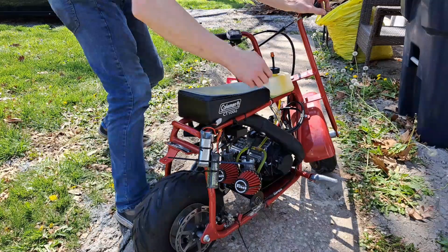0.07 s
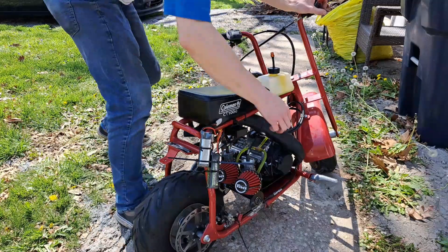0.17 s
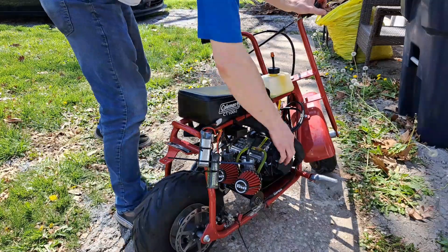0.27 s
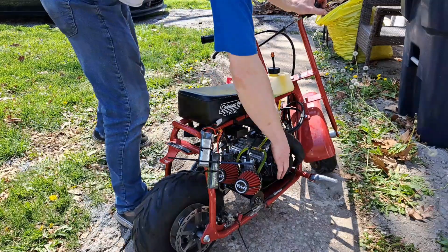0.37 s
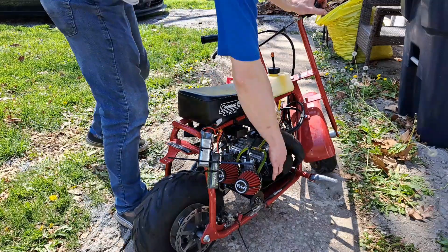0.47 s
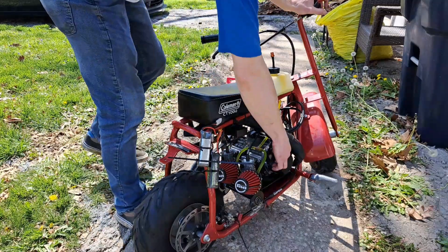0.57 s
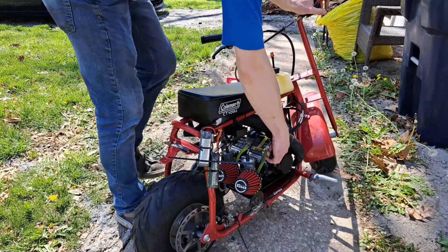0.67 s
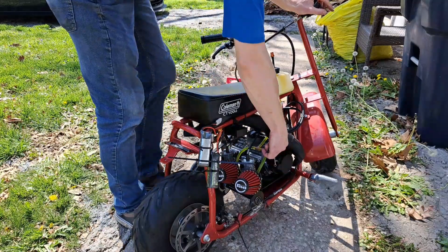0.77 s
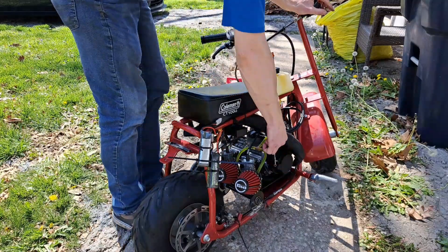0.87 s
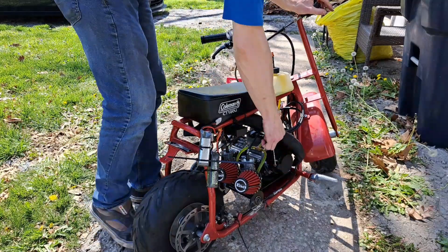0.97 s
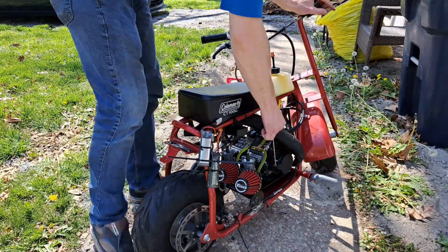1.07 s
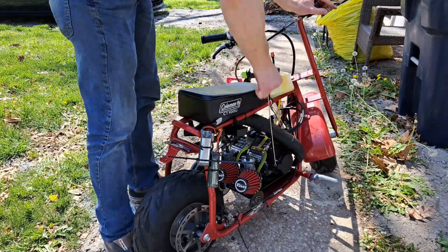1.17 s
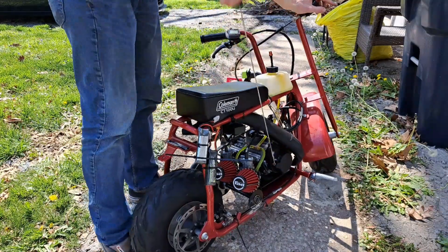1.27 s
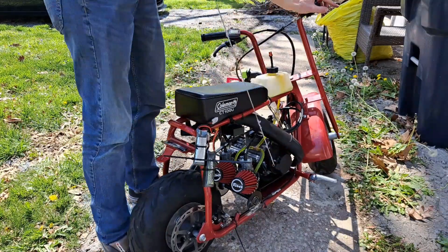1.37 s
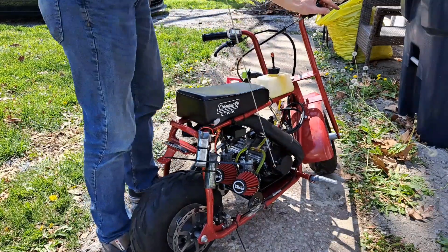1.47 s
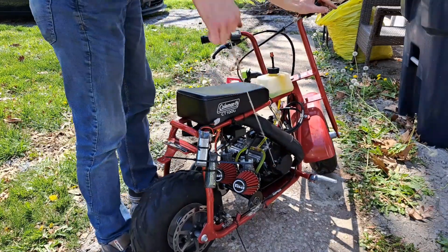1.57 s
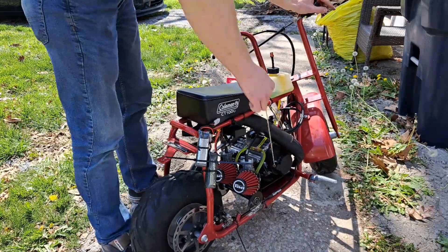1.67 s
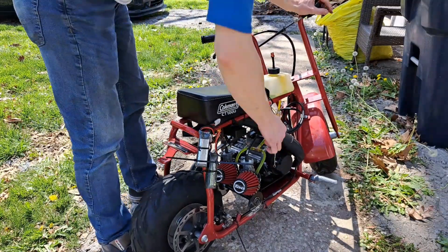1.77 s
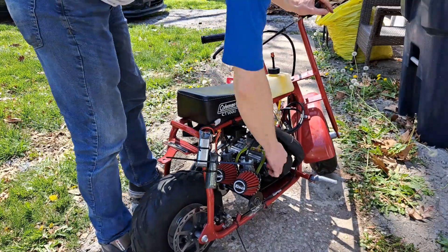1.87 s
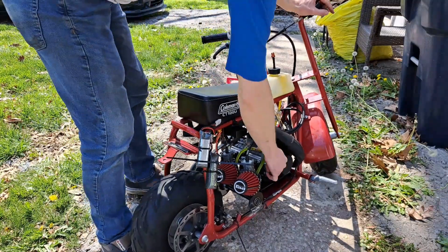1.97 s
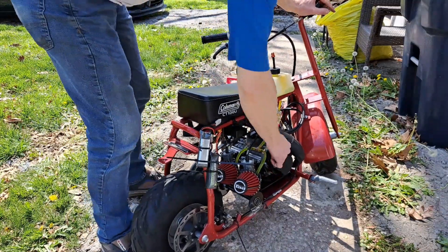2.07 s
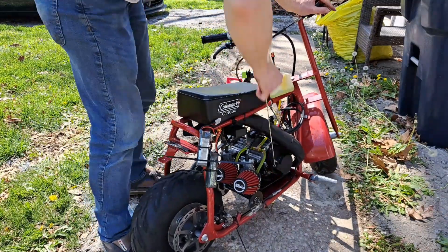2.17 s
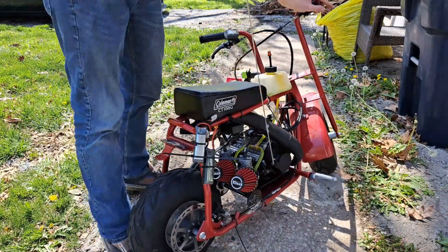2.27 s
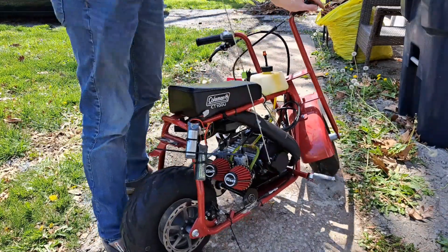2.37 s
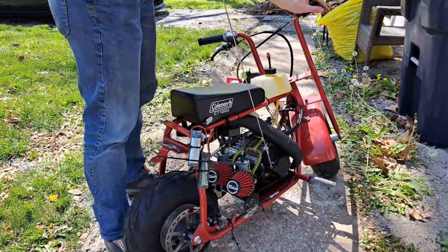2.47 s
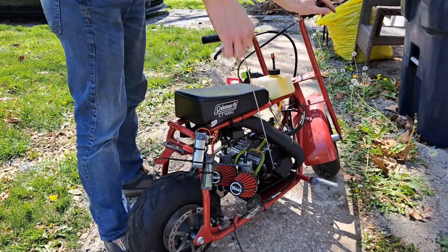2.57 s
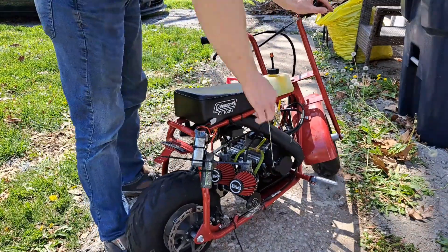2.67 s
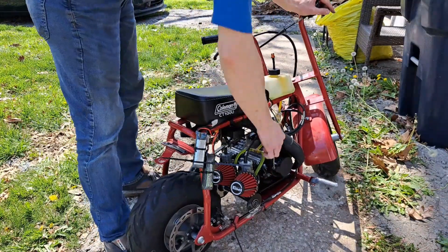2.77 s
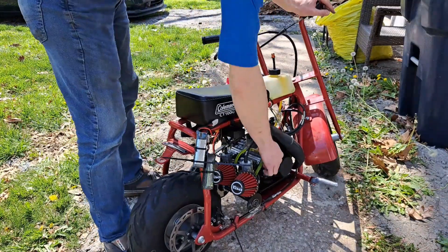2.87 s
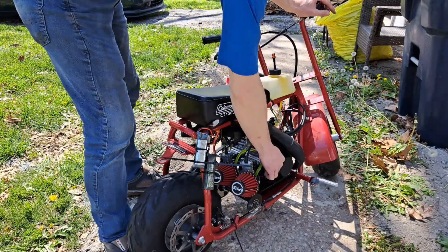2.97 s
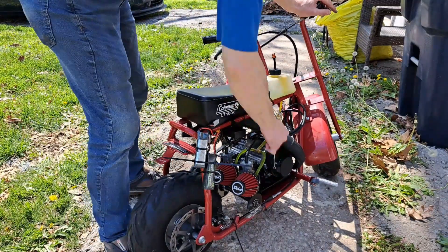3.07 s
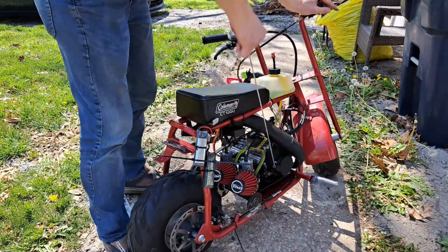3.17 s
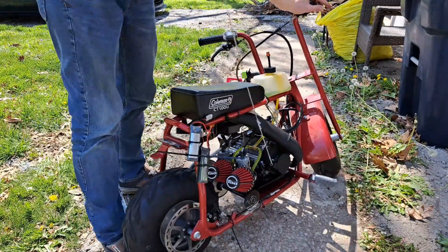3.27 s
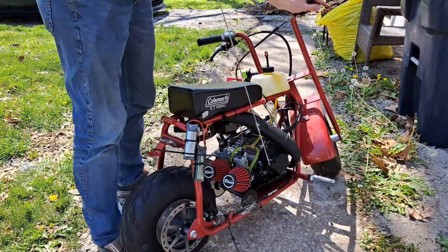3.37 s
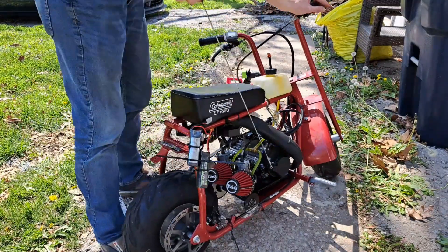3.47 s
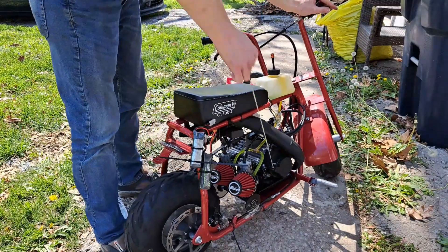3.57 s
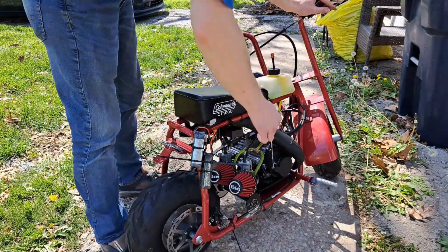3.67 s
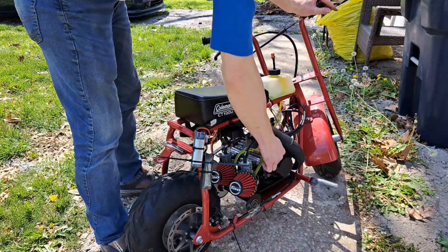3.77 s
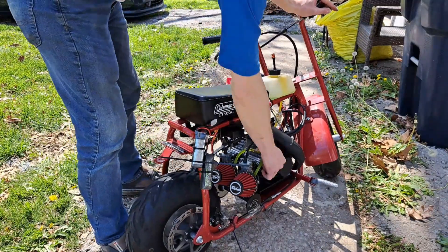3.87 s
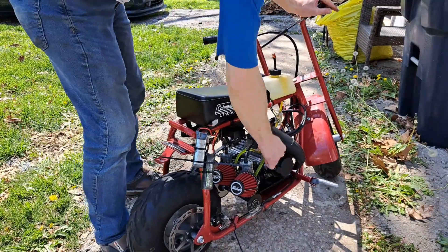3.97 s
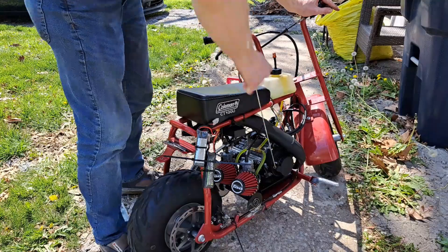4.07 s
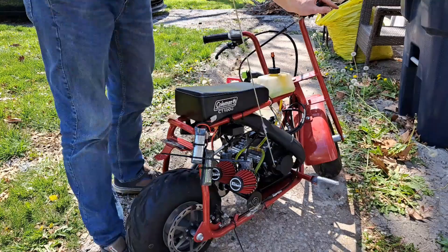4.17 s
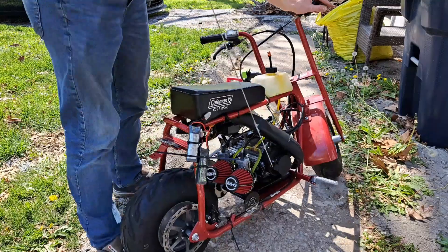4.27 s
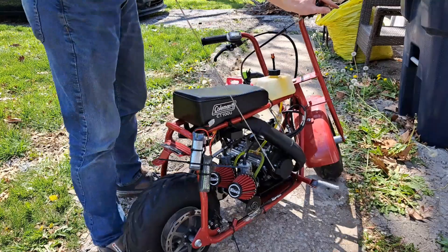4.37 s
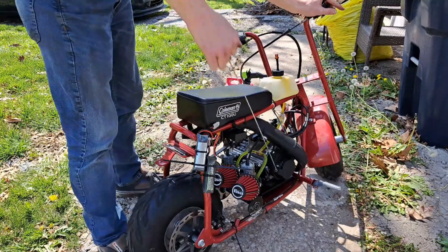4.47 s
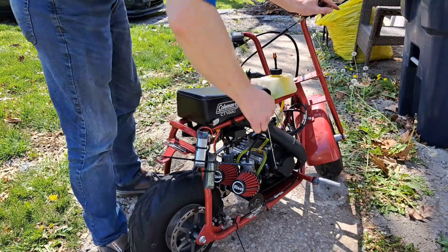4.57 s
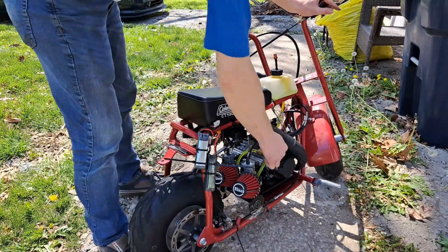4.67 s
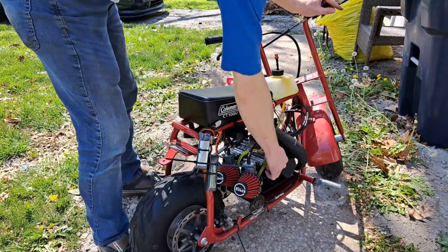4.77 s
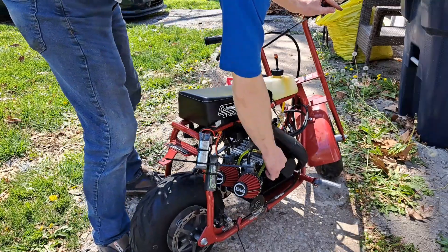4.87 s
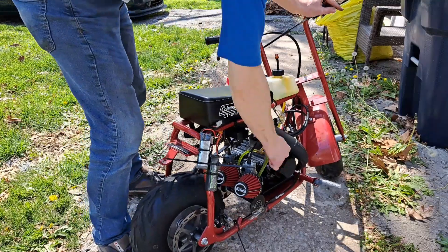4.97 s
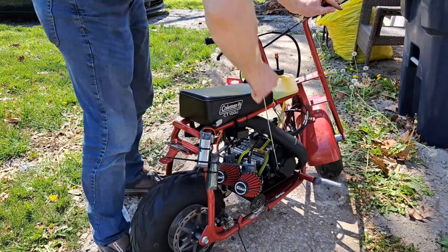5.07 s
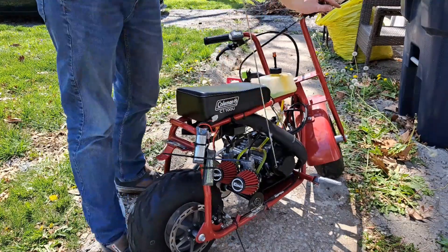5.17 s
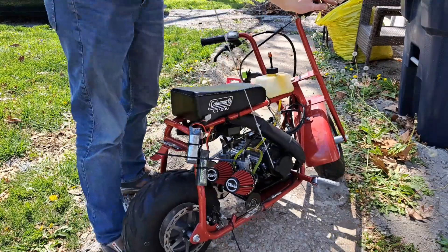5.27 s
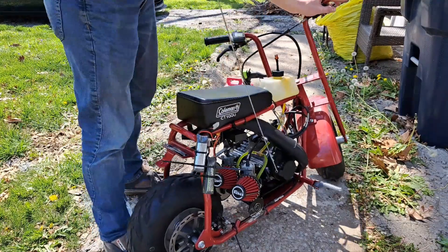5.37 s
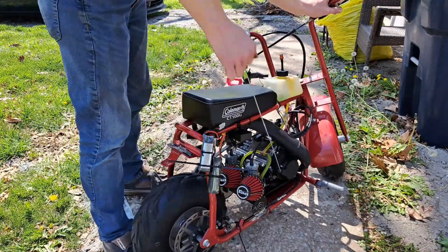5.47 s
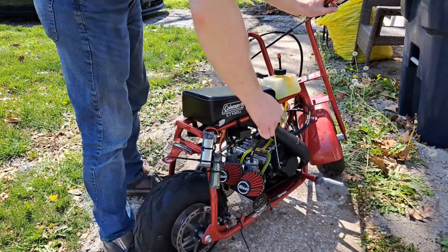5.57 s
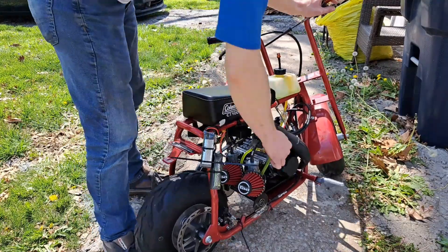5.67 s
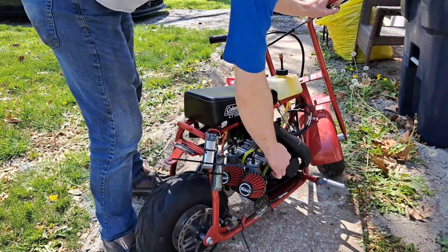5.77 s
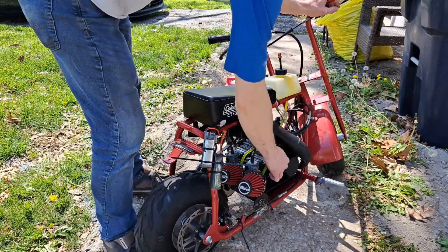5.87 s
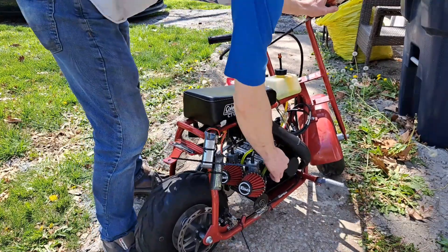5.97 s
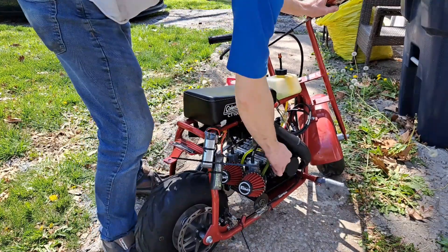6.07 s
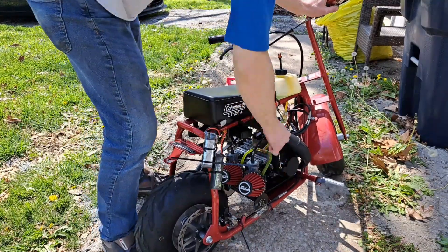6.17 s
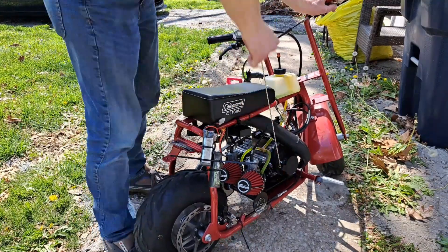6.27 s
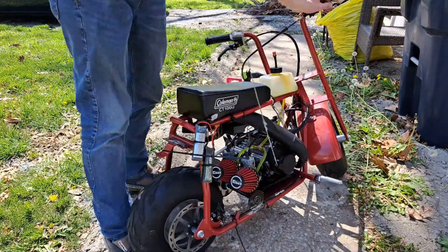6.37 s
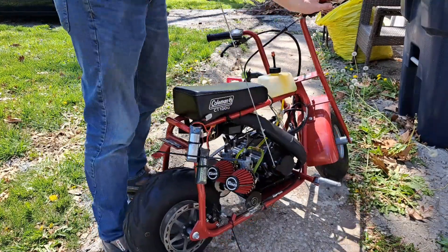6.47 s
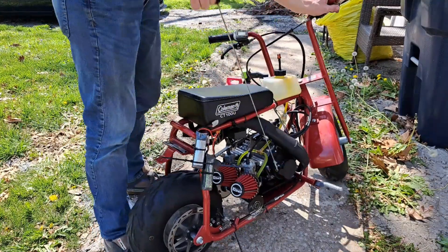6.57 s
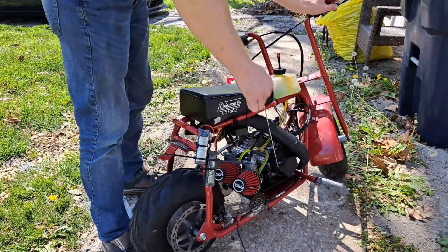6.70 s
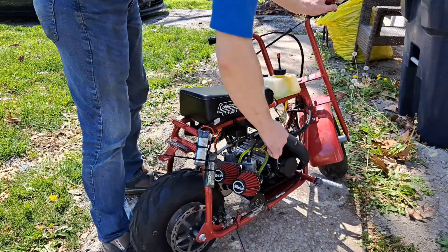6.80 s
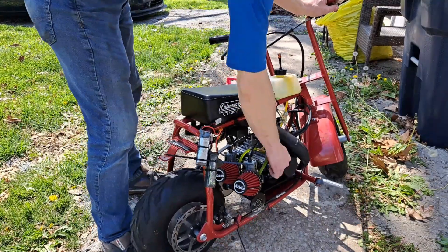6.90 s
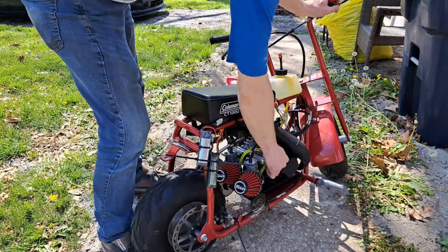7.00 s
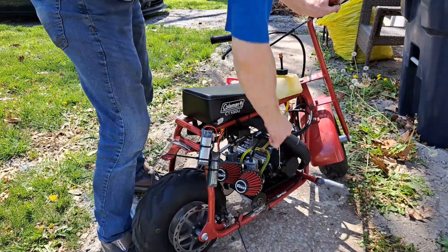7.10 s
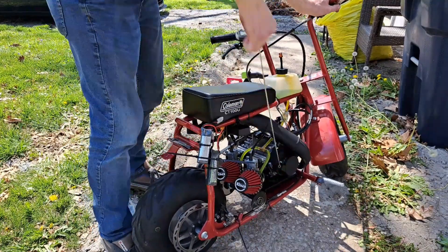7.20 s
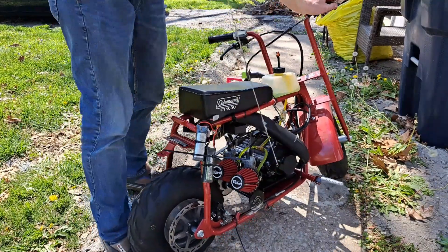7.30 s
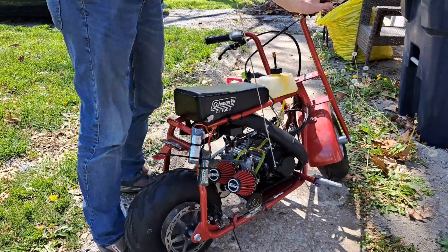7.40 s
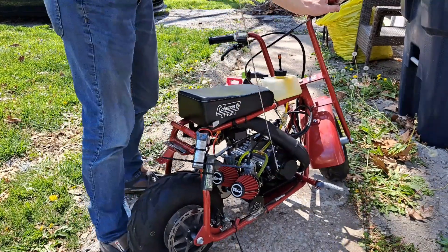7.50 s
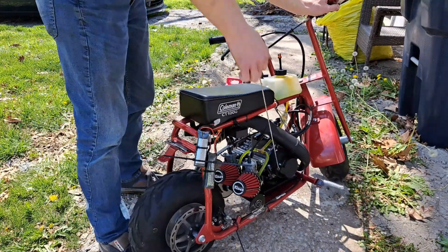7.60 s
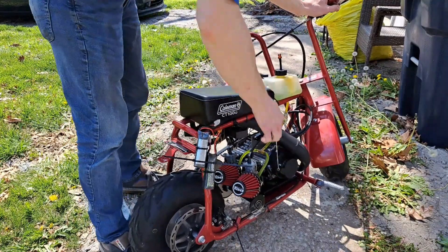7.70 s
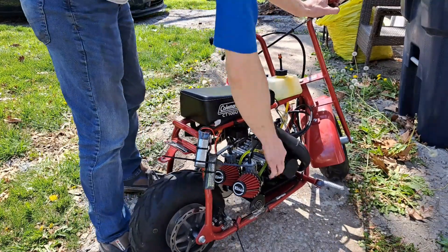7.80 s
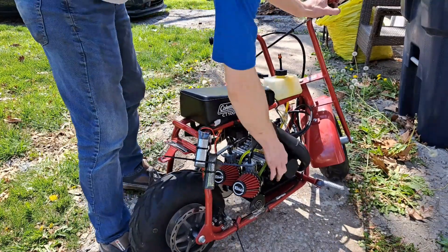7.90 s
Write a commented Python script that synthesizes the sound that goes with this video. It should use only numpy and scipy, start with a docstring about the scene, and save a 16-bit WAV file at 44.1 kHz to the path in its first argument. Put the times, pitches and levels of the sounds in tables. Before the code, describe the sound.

After brushing cloth and handling bumps, seven rough pull-cord cranks rasp and chug close by, each followed by rattling rope rewind, without the engine starting.

```python
"""A close outdoor microphone hears faint bass hush, mount jolts, brushing cloth, knocks and one clink.
Then come seven pulls on the recoil starter of a small engine that never catches: noise-gated air roars,
periodic puffs boom and noise rings the pipe. After each pull, pawl drops excite the modes of a steel cup
at widening gaps, and most pulls leave the mount shuddering. Rope rubs between pulls; a thin tone sounds
before and after the third. The roar and clatter dip at listed instants; a look-ahead limiter ducks peaks."""
import sys
import numpy as np
from scipy import signal
from scipy.fft import rfft, irfft, next_fast_len
from scipy.io import wavfile
from scipy.ndimage import uniform_filter1d, minimum_filter1d

SR = 44100
rng = np.random.default_rng(int(sys.argv[2]) if len(sys.argv) > 2 else 0)


def amplitude_ratio(level_db):
    """Convert a level in decibels to the matching linear amplitude (field) ratio."""
    exponent = np.asarray(level_db, float) / 20
    return 10 ** exponent


def to_wav(s):
    """Save 16-bit WAV."""
    ch = np.atleast_2d(s).T  # columns
    pcm = np.round(np.clip(ch, -1, 1) * 32767)  # PCM
    wavfile.write(sys.argv[1], SR, pcm.astype(np.int16))


N = 350154
TIME = np.arange(N) / SR

# Pulls on the rope: (start [s], end [s], relative roar level [dB], mean puff rate [Hz],
# pipe resonance [Hz], relative pipe level [dB])
PULLS = [(1.239, 1.522, -10, 70.5, 377, -2.5), (2.234, 2.48, -9.5, 65.5, 367, -2),
         (3.199, 3.472, -10.5, 67.34, 382, -0.4), (4.127, 4.362, -13.5, 66.35, 380, -1.3),
         (5.147, 5.379, -12, 67.3, 387, 0), (6.322, 6.556, -12, 69, 431, 2.5),
         (7.238, 7.488, -12, 65.2, 411, 0.5)]
# Turning of the spool as the rope rewinds:
# (start [s], last pawl drop [s], steady gap [ms], last gap [ms])
REWINDS = [(1.57, 1.917, 22.4, 44.9), (2.49, 2.899, 21.3, 48), (3.565, 3.848, 20.5, 44.6),
           (4.44, 4.764, 19.4, 40), (5.445, 5.766, 22.1, 45.1), (6.6, 6.932, 20.3, 38.9),
           (7.54, 7.892, 20.4, 48.7)]
# How the roar follows a pull:
# (start delay [s], end advance [s], level offset [dB], rise [dB/s], fall [dB/s])
ROAR_SHAPE = (0, 0, -1.5, 330.5, 297.5)


def unit(x):
    """Normalisation: scales a signal to an rms of 1."""
    return x / np.sqrt(np.mean(x ** 2))


def noise():
    """White noise: independent Gaussian samples with equal mean power at all frequencies."""
    return rng.standard_normal(N)


def colour(x, points):
    """Spectral shaping: a gain through (frequency [Hz], gain [dB]) points on a log-frequency axis."""
    size = next_fast_len(N)
    hz, db = np.transpose(points)
    log_hz = np.log(np.arange(size // 2 + 1) * SR / size + 1)
    gain = amplitude_ratio(np.interp(log_hz, np.log(hz), db))
    return irfft(rfft(x, size) * gain, size)[:N]


def ring(x, hz, width):
    """Resonance: a two-pole filter of given bandwidth [Hz] with gain 1 at its centre."""
    return signal.lfilter(*signal.iirpeak(hz, hz / width, fs=SR), x)


def flicker(rate, spread_db):
    """Random amplitude modulation: a gain wandering in dB about rate times a second."""
    hold = int(SR / rate)
    steps = np.repeat(rng.standard_normal(N // hold + 1), hold)
    return amplitude_ratio(spread_db * unit(uniform_filter1d(steps, hold)[:N]))


def bursts(rows, rise_ms):
    """Transient envelopes of (time [s], level [dB], decay constant [ms]): quick rise, exponential fall."""
    env = np.zeros(N)
    for s, db, decay_ms in rows:
        start = int(max(s - rise_ms / 1000, 0) * SR)
        t_ms = 1000 * TIME[:min(SR // 2, N - start)]
        rise = (1 - np.exp(-t_ms / rise_ms)) ** 2
        env[start:start + len(t_ms)] += amplitude_ratio(db) * rise * np.exp(-t_ms / decay_ms)
    return env


def swell(rows, rise, fall):
    """Exponential gain ramps [dB/s] up to and down from (start [s], end [s], level [dB]) spells."""
    gain = 0
    for start, end, db in rows:
        below_db = rise * np.maximum(start - TIME, 0) + fall * np.maximum(TIME - end, 0)
        gain = gain + amplitude_ratio(db - below_db)
    return gain


def effort(pulls, shape):
    """Common excitation: the gain of a layer that follows the pulls."""
    late, early, over_db, rise, fall = shape
    rows = [(a + late, b - early, db + over_db) for a, b, db, *_ in pulls]
    return swell(rows, rise, fall)


def yard():
    """Ambient noise: two low resonances leave a faint outdoor hush in the bass."""
    bass = ring(ring(noise(), 60.0, 70.), 65., 250.)
    return amplitude_ratio(-54.5) * unit(bass)


def jolts():
    """Transient oscillation: the mount swings for a few wobbly cycles, with an overtone and a noisy thud."""
    # Jolts of the microphone mount:
    # (time of fullest swing [s], relative level [dB], central pitch [Hz], length scale [ms])
    jolt_rows = [(0.036, 0, 78, 47), (0.166, -6, 95.6, 40), (0.2, -6.5, 96.3, 23), (0.3, -40, 86, 29),
                 (0.462, -35, 102, 32), (0.875, -5, 66.7, 47), (0.958, -8, 83.2, 43),
                 (1.06, -4.5, 65.6, 33), (1.155, -2.5, 67.2, 24), (1.178, -5, 68, 31), (1.241, 8, 93.5, 26),
                 (1.667, -12.5, 74, 21), (1.877, -10, 71.4, 39), (2.017, -22, 95, 72),
                 (2.589, -12.5, 81.5, 29), (2.74, -24.5, 101.2, 210), (3.075, -15.5, 83.3, 30),
                 (4.089, -4.5, 77.6, 26), (4.48, -10.5, 76, 19), (5.041, -24, 84, 39),
                 (5.144, -8.5, 76, 20), (5.41, -6, 92.8, 15), (5.619, -13, 89.7, 90),
                 (5.687, -13.5, 87.6, 19), (5.922, -9, 81.4, 13.7), (6.199, -16.5, 80.6, 19),
                 (6.249, -5.5, 83.3, 34), (6.607, -8, 70.3, 14), (6.642, -8.5, 58.7, 23),
                 (6.804, -5, 59.5, 27), (6.976, -8, 79.7, 18), (7.065, -24, 76, 26), (7.208, -4, 83.3, 23)]
    rows = jolt_rows + shudders()
    swings = np.zeros(N)
    wobble = np.log(flicker(50, 5.))  # phase in radians
    turns = rng.random(len(rows))
    for (s, db, hz, ms), turn in zip(rows, turns):
        near = slice(max(int((s - .15) * SR), 0), int((s + .15) * SR))
        t = TIME[near] - s
        width_s = 0.52 * ms / 1000 * np.where(t < 0, .55, 1.25)
        cycles = hz * t * (1 - .08 * np.tanh(t / .03)) + turn  # the pitch glides down
        swing = np.sin(2 * np.pi * cycles + wobble[near])
        bent = swing - .35 * swing ** 2  # the square adds an octave
        swings[near] += amplitude_ratio(db) * np.exp(-np.abs(t / width_s) ** 1.6) * bent
    band = signal.butter(3, [110., 330.], "band", fs=SR, output="sos")
    thud = unit(signal.sosfilt(band, noise())) * np.abs(swings) * amplitude_ratio(-11.5)
    low_cut = signal.butter(3, 40., "high", fs=SR, output="sos")
    return signal.sosfilt(low_cut, swings + thud)


def cloth():
    """Friction noise: fabric fibres crackle in patches, as a flickering gain on coloured noise."""
    # Cloth brushing before the first pull: (start [s], end [s], level [dB])
    brushes = [(0.02, .8, -51.5), (.1, 0.27, -37.5), (.365, 0.39, -49), (.55, 0.68, -45.5),
               (.62, 0.89, -55.5), (.865, 1, -41.5), (1.165, 1.15, -29.5)]
    # Colour of the fabric: (frequency [Hz], gain [dB])
    fabric = [(180, -57), (300, -47), (2010, -24), (2620, -15.5), (4600, -32.5), (5510, -17),
              (10000, -15.5), (14600, -13.5), (15600, -26.5)]
    crackle = colour(noise() * flicker(300, 3.6), fabric)
    return unit(crackle) * swell(brushes, rise=1300.0, fall=1200.0)


def starter():
    """Modal excitation: impacts as sprays of tiny bounces, spool, shaking and rope all ring the cup."""
    # Modes of the steel cup and housing: (frequency [Hz], bandwidth [Hz], relative level [dB])
    cup = [(860, 50, -5), (1430, 70, -4), (1590, 12, -9), (2290, 150, 0), (2770, 170, -9), (3120, 5, -9),
           (3770, 10, -10), (3900, 140, -4), (4620, 150, 0), (4830, 120, 1), (5000, 110, 0),
           (6780, 110, -10), (7330, 160, -14), (8960, 110, -13), (11000, 220, -12)]
    # Broad colour of the clatter: (frequency [Hz], gain [dB])
    clatter = [(250, -39.5), (450, -15), (900, -6.5), (2500, -5), (5000, -6), (8000, -14), (13000, -16.5),
               (16000, -21)]
    bounces = noise() * flicker(900, 1.8)
    blows = bursts(pawl_blows(), rise_ms=4.5) + knocks()
    rubbing = noise() * flicker(40, 2.4) * (spool_whir() + cup_shaking() + rope_drag())
    drive = bounces * blows + rubbing
    # the balance of the modes wanders, so successive blows favour other modes
    favour = [flicker(30, 3.5) for _ in cup]

    def modes(x):
        """Modal superposition: sums the resonances with alternating sign."""
        total = 0
        for k, (hz, width, db) in enumerate(cup):
            total = total + (-1) ** k * amplitude_ratio(db) * ring(x * favour[k], hz, width)
        return total

    # both paths are scaled by what they do to steady noise
    broad_part = colour(drive, clatter) / colour(bounces, clatter).std()
    modal_part = modes(drive) / modes(bounces).std()
    return amplitude_ratio(-3) * broad_part + amplitude_ratio(-3) * modal_part


def knocks():
    """Impact: handle, rope and pawls knock the housing, each with a hard snap at its onset."""
    # Knocks: (time [s], relative level [dB], decay constant [ms])
    knock_rows = [(0.0224, -9, 1.6), (0.848, -37, 5.9), (0.8958, -23.5, 4.6), (1.2596, -12, 3.8),
                  (1.4775, 3.5, 14), (2.0968, -18, 21), (3.065, -15.5, 8.3), (3.213, -9, 3),
                  (3.4205, 1.5, 12), (4.0727, -18.5, 12), (4.134, -2.5, 9.8), (4.43, -12.5, 16),
                  (4.991, -28, 19), (5.148, -12, 7), (5.43, -14, 35), (6.117, -53, 6), (6.338, -8, 6.4),
                  (7.0927, -31.5, 25), (7.235, -16.5, 2.5)]
    snaps = [(s, db + 5, 1) for s, db, _ in knock_rows]
    return bursts(knock_rows, rise_ms=.6) + bursts(snaps, rise_ms=.6)


def clink():
    """Free modal decay: a small metal fitting sounds three thin partials that swell over a few ms and fade."""
    # Partials of the fitting: (frequency [Hz], relative level [dB], 60 dB decay time [s])
    partials = [(3800, -34.5, 0.39), (6170, -27, 0.24), (8900, -31, .2)]
    t = np.maximum(TIME - 0.079, 0)
    rise = 1 - np.exp(-t / 0.0081)
    out = np.zeros(N)
    for hz, db, t60 in partials:
        out += amplitude_ratio(db) * np.sin(2 * np.pi * hz * t) * rise * np.exp(-np.log(1000) * t / t60)
    return out


def rope_drag():
    """Sliding friction: the gain of slack rope dragging on the housing."""
    # Drags: (start [s], end [s], relative level [dB])
    drags = [(.09, .16, -34.5), (.86, .96, -39.5), (1.04, 1.12, -59.5), (1.165, 1.2, -31.5),
             (1.96, 2.06, -35.5), (2.1, 2.15, -32), (3.06, 3.11, -30.5), (3.99, 4.07, -33),
             (5.0, 5.05, -42.5), (7.1, 7.18, -37.5)]
    return swell(drags, rise=530.0, fall=360.0)


def cup_shaking():
    """Forced vibration: the cup rattles through a pull, as the pawls bite and over the last stretch of rope."""
    bites = [(a, -25.5, 28) for a, *_ in PULLS]
    strain_s, strain_db = 0.099, -11
    strains = [(b - strain_s, b, db + strain_db) for _, b, db, *_ in PULLS]
    steady = amplitude_ratio(-18.5) * effort(PULLS, ROAR_SHAPE)
    return steady + bursts(bites, rise_ms=13.0) + swell(strains, rise=1100.0, fall=1200.0)


def cranking():
    """Periodic flow: uneven puffs boom low, gusts of noise at their rate ring the pipe, and air roars in strokes."""
    # How pipe and puffs follow a pull:
    # (start delay [s], end advance [s], level offset [dB], rise [dB/s], fall [dB/s])
    pipe_shape = (0.05, 0.03, -2, 299.5, 350.5)
    puff_shape = (.055, .03, .5, 300, 220)
    # Colour of the roar: (frequency [Hz], gain [dB])
    roar_colour = [(150, 6), (300, -7), (700, -1), (1600, -2.5), (4500, -10.5), (7000, -19.5),
                   (13000, -23.5), (16000, -27.5)]
    puffs, rings = np.zeros((2, N))
    for pull in PULLS:
        rate_hz, pipe_hz, pipe_db = pull[3:]
        turns = np.cumsum(rate_hz * flicker(45, 1.6)) / SR
        puff = np.sin(2 * np.pi * turns) + .25 * np.cos(4 * np.pi * turns)
        puff = puff * flicker(35, 2.)
        gust = (0.27 + np.exp(-((turns + .5) % 1) / 0.6)) * flicker(70, 4.2)
        pipe = ring(ring(gust * noise(), pipe_hz, 79.0), pipe_hz, 480.0)
        puffs += unit(puff) * effort([pull], puff_shape)
        rings += unit(pipe) * effort([pull], pipe_shape) * amplitude_ratio(pipe_db)
    strokes = flicker(45, 2.2) * flicker(130, 3.2) * flicker(900, 3.)
    roar = colour(strokes * noise(), roar_colour)
    # the throaty part swells and shrinks on its own, so the colour keeps changing
    roar += ring(roar, 1000., 1500.) * (flicker(30, 2.8) - 1)
    return puffs, rings + unit(roar) * (effort(PULLS, ROAR_SHAPE) + barks())


def barks():
    """Transient flow: extra gain makes the roar bark as a pull takes hold and as it lets go."""
    length_s = .025
    ends = []
    for a, b, db, *_ in PULLS:
        ends.append((a + 0.014, a + 0.0067 + length_s, db - 4.5))
        ends.append((b - .025 - length_s, b - .025, db - 6.5))
    return swell(ends, rise=800.0, fall=350.0)


def cutouts():
    """Amplitude gating: a gain that dives for a few ms at each listed instant."""
    # Centres of the dips: (time [s])
    dips = [1.281, 1.331, 1.446, 2.269, 2.301, 2.322, 2.345, 2.425, 3.41, 4.325, 4.361, 4.475, 6.364, 6.8,
            7.479]
    depth = sum(np.exp(-((TIME - s) / 0.0018) ** 2) for s in dips)
    return amplitude_ratio(-22 * depth)


def spool_whir():
    """Damped rotation: the spool whirs under the first drops of each rewind and runs down."""
    return bursts([(row[0], -15, 90.) for row in REWINDS], rise_ms=64.0)


def shudders():
    """Decaying vibration: six small uneven jolts follow a pull, on average each a little weaker."""
    # Pulls that leave the mount shuddering: (index of the pull, from 0)
    shaken = (0, 1, 2, 3, 5, 6)
    gap_s, first_db, loss_db = 0.051, -12.5, 1
    chance = rng.uniform(-1, 1, (len(shaken), 6, 4))
    rows = []
    for p, draws in zip(shaken, chance):
        for k, c in enumerate(draws):
            s = PULLS[p][1] + gap_s * (k + .3 * c[0])
            db = first_db - loss_db * k + 3 * c[1]
            rows.append((s, db, 72 + 18 * c[2], 26 + 8 * c[3]))
    return rows


def pawl_blows():
    """Slowing rotation: gaps widen toward the last drop; drops start soft, then land firm with some scatter."""
    # Single pawls that drop outside the run of a rewind: (time [s], relative level [dB])
    lone_drops = [(3.884, -12.5), (4.012, -6.5), (5.839, -6.5)]
    slowing_drops = 1.6  # the widening shrinks by a factor e over this many drops, counted backwards
    rows = []
    for start, last, steady_ms, last_ms in REWINDS:
        gaps_ms = steady_ms + (last_ms - steady_ms) * np.exp(-np.arange(30) / slowing_drops)
        times = last - np.cumsum(np.r_[0, gaps_ms]) / 1000  # from the last drop backwards
        for k, s in enumerate(times[times > start][::-1]):
            db = -1.5 - 5 * np.exp(-k / 1.9) + 0.8 * rng.standard_normal()
            rows.append((s, db, 9.5))
    return rows + [(s, db, 9.) for s, db in lone_drops]


def whine():
    """Frequency modulation: a thin metal tone lingers, wavering a little in pitch and level."""
    # The tone before and after the third pull: (start [s], end [s], rms level [dB])
    spells = [(2.92, 3.19, -45), (3.5, 3.97, -48)]
    fade = swell(spells, rise=400., fall=300.)
    cycles = np.cumsum(3769. * flicker(60, .02)) / SR
    return np.sqrt(2) * np.sin(2 * np.pi * cycles) * flicker(40, 2.5) * fade


def scene():
    """Superposition and reverberation: all sources add, and nearby walls return a short tail of the clatter."""
    metal = starter()
    t = TIME[:SR // 4]
    tail = rng.standard_normal(len(t)) * np.exp(-np.log(1000) * t / 0.18)  # 60 dB in 0.18 s
    walls = amplitude_ratio(-11) * signal.fftconvolve(metal, tail / np.linalg.norm(tail))[:N]
    puffs, rush = cranking()
    gated = (metal + walls + rush) * cutouts()
    mono = gated + puffs + jolts() + clink() + whine() + cloth() + yard()
    # left and right differ by a faint smeared copy
    smear = tail[:400] / np.linalg.norm(tail[:400])
    side = amplitude_ratio(-34) * signal.fftconvolve(mono, smear)[:N]
    return np.array([mono + side, mono - side])


def low_pass(x):
    """Removes everything above the highest recorded frequency."""
    return signal.sosfilt(signal.butter(12, 15780, fs=SR, output="sos"), x)


def record(dry):
    """Look-ahead limiting: peaks of the left channel duck both for a few ms; a low-pass cuts the top."""
    hold = int(.004 * SR)
    needed = np.minimum(1, amplitude_ratio(-.4) / (np.abs(dry[0]) + 1e-9))
    duck = uniform_filter1d(minimum_filter1d(needed, 2 * hold), hold)
    top = signal.ellip(8, .2, 70, 16100, fs=SR, output="sos")
    mix = signal.sosfilt(top, dry * duck)
    return low_pass(mix)


dry = scene()
out = record(dry)
to_wav(out)
```